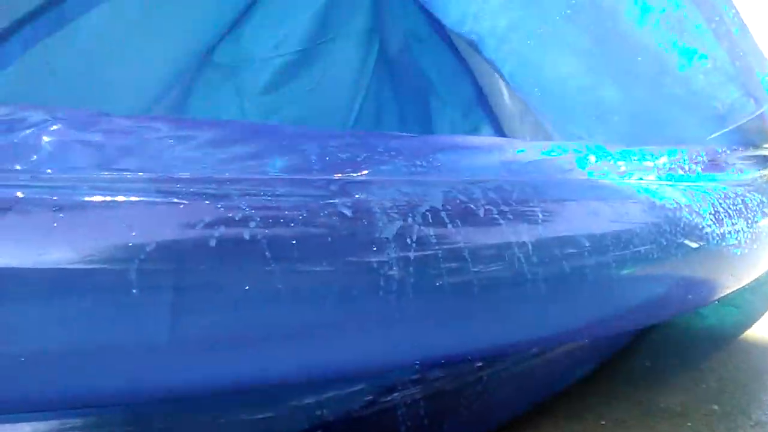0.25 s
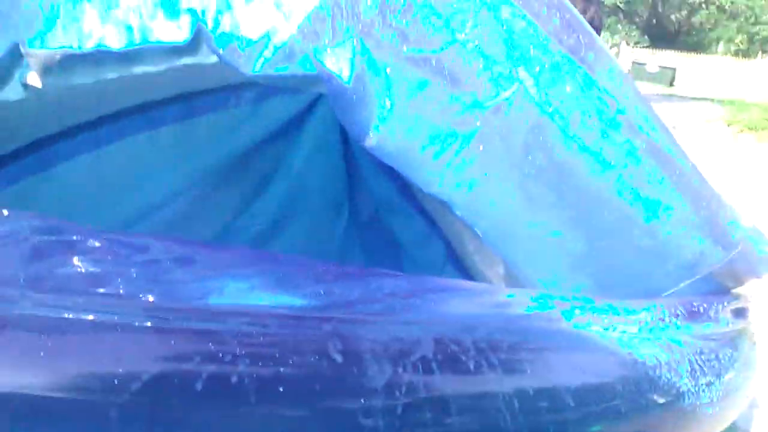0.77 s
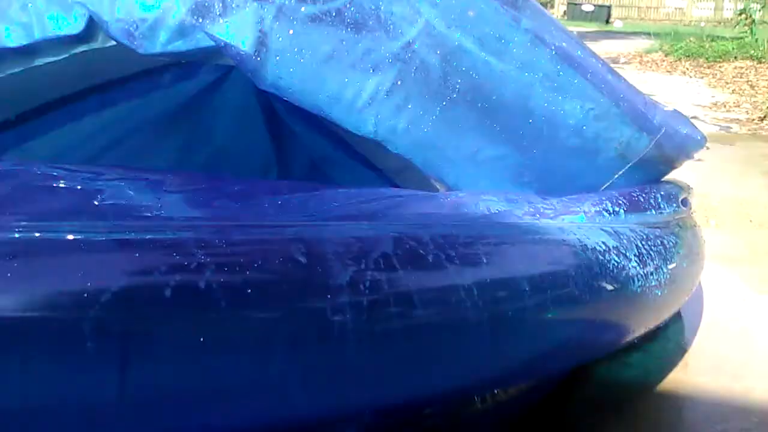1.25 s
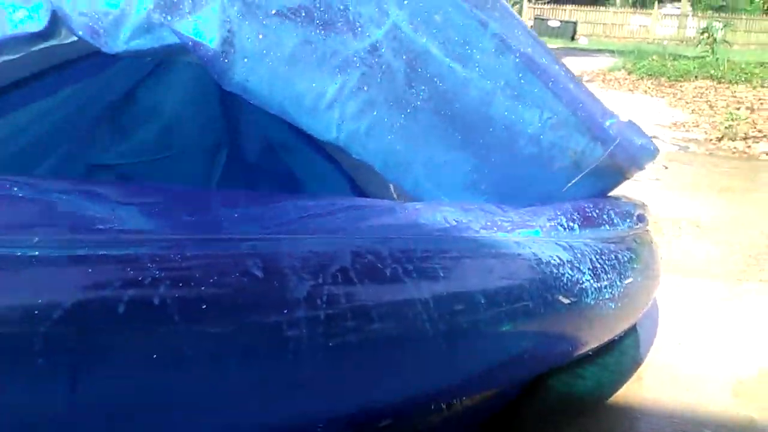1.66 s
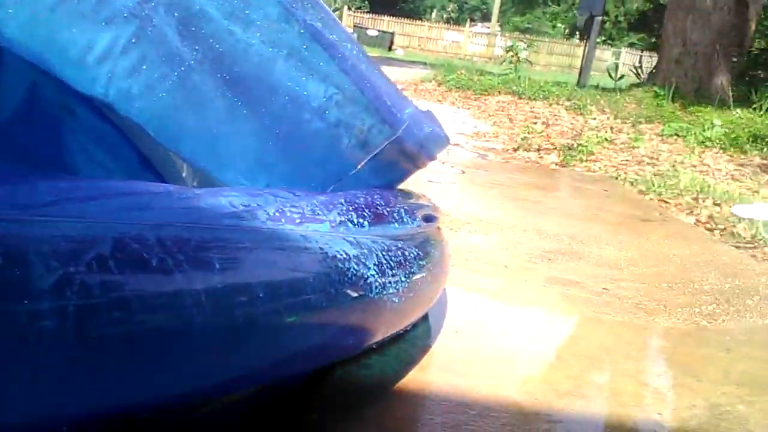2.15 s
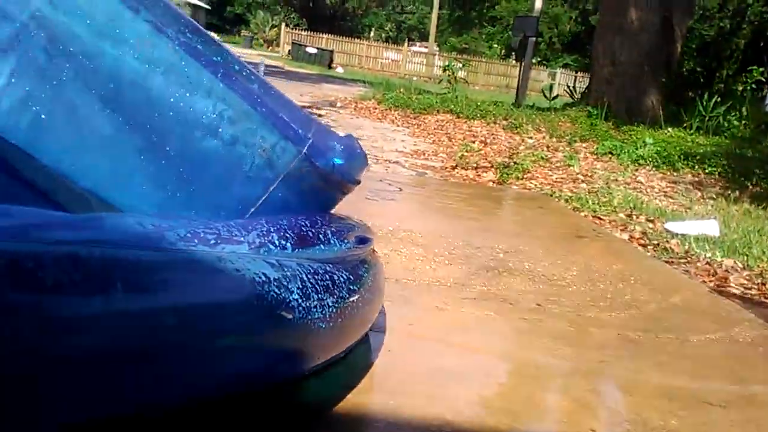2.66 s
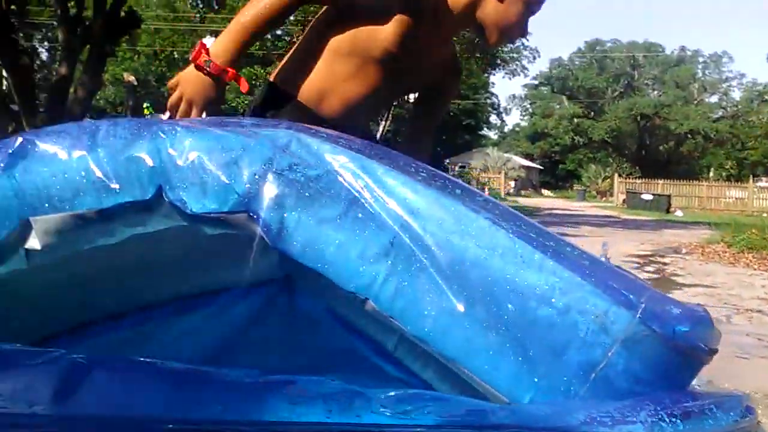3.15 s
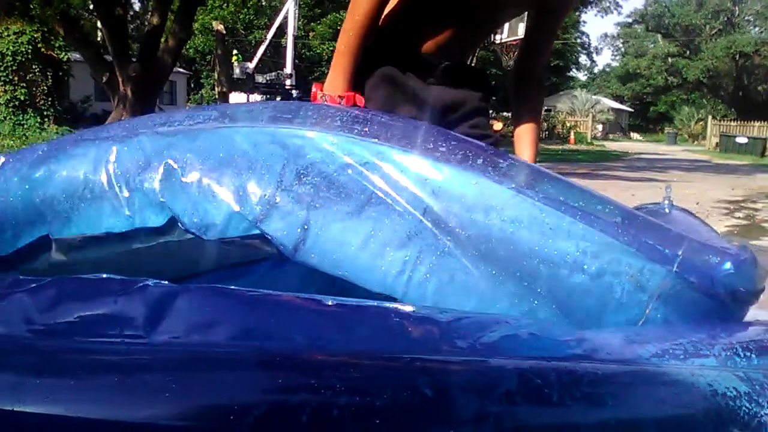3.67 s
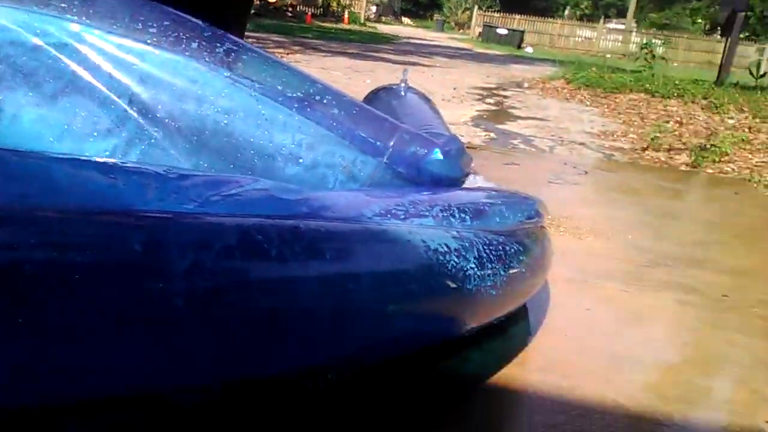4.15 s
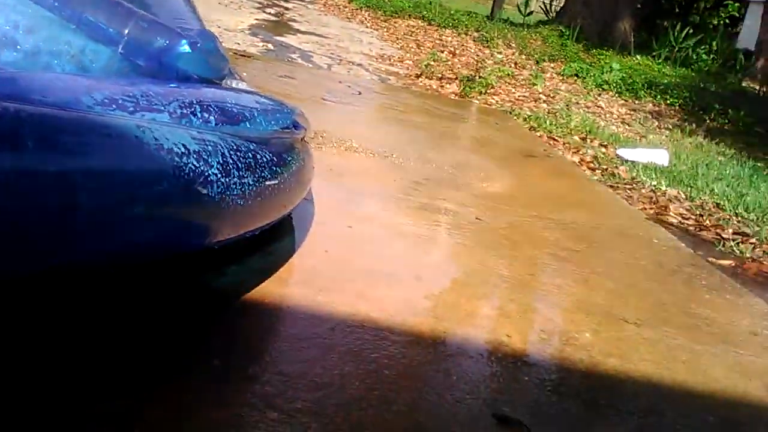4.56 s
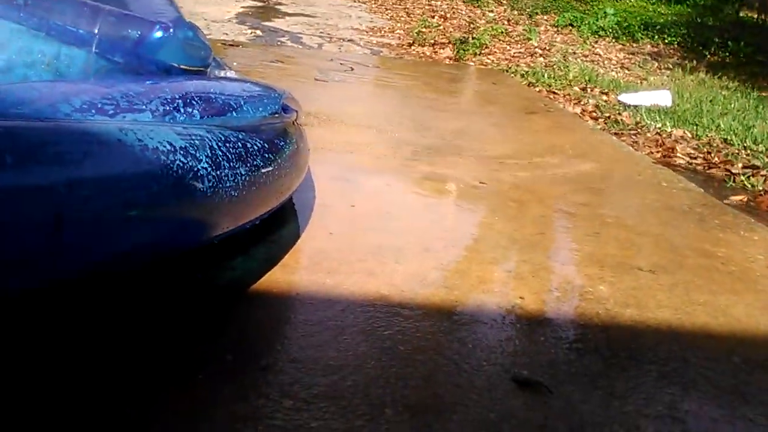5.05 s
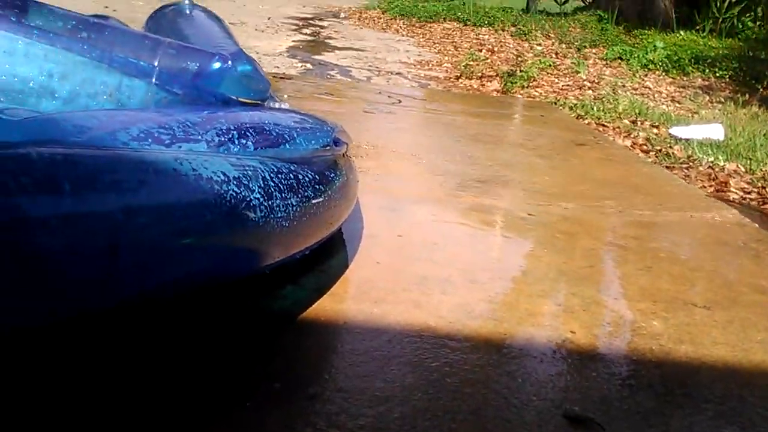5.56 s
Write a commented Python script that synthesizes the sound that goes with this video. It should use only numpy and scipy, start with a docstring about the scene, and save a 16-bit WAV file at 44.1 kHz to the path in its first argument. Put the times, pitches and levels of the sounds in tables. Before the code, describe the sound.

Water spills from a tipped inflatable pool onto a wet driveway, close by. It starts with a light hiss and separate bubbly plops, then gurgles in a quick cluster from about 1.2 to 1.7 seconds. After a brief lull, the strongest slosh arrives at 2.3 seconds with a dull bump and deep glugs, and busy bubbling and splatter continue until 3.3 seconds. The flow then thins to fine spray and small high drips, and is faint by 5 seconds. A thin, fluttering whistle sounds softly from 3.3 seconds and fades by about 5. Soft bumps come around 4.3 and 4.6 seconds, and a fold of vinyl snaps once at 4.7. Songbirds repeat short, slightly echoing chirps throughout, quieter than the water. Underneath are a faint idling engine, distant road rumble and a light outdoor hiss.

```python
"""Water spills and gurgles out of a tipped vinyl pool onto a driveway, close by.
Spray hisses, trapped air rings as bubbles, drops burst on the wet ground and, late on, a fold of
vinyl pops open. Songbirds whistle from the trees, which scatter their notes back, and a thin
whistling tone swells and fades. Underneath are a few dull bumps, an engine idling far off,
the murmur of distant roads and a faint hiss of air."""
import sys
import numpy as np
from scipy import signal
from scipy.fft import rfft, irfft, next_fast_len
from scipy.io import wavfile
from scipy.ndimage import uniform_filter1d

SR = 44100
rng = np.random.default_rng(int(sys.argv[2]) if len(sys.argv) > 2 else 0)


def digitize_waveform(pressure):
    """Quantize a signal to 16-bit integers and store it at the path in sys.argv[1].

    Rows of a 2-D input are taken as channels; values are limited to [-1, 1].
    """
    field = np.atleast_2d(pressure).T
    bounded = np.clip(field, -1, 1)
    quanta = np.round(bounded * 32767).astype(np.int16)
    wavfile.write(sys.argv[1], SR, quanta)


N = 256220


def gain_of(db):
    """Decibels to amplitude."""
    return 10 ** (np.asarray(db) / 20)


def unit_rms(x):
    """Scales a signal to rms 1."""
    return x / np.sqrt(np.mean(x ** 2) + 1e-20)


def fader(table, column):
    """Gain at every sample, riding one dB column of a table whose rows start with a time."""
    rows = np.array(table)
    return gain_of(np.interp(np.arange(N) / SR, rows[:, 0], rows[:, column]))


def add(mix, start_s, sound):
    """Drops a sound into the mix at its start time."""
    part = mix[round(start_s * SR):][:len(sound)]
    part += sound[:len(part)]


def coloured(x, eq):
    """Equalises through (Hz, dB) points joined on a log-frequency axis."""
    size = next_fast_len(len(x), True)
    hz, db = np.transpose(eq)
    curve_db = np.interp(np.log(np.fft.rfftfreq(size, 1 / SR) + 1), np.log(hz + 1), db)
    return irfft(rfft(x, size) * gain_of(curve_db), size)[:len(x)]


def wander(hz, count=N):
    """Smooth random modulation up to about the given rate, rms 1."""
    lowpass = signal.butter(2, min(hz, 600), fs=SR / 32)
    steps = signal.lfilter(*lowpass, rng.standard_normal(count // 32 + 1000))[900:]
    return np.interp(np.arange(count) / 32, np.arange(len(steps)), unit_rms(steps))


def patchy_noise(patch_db, flicker_db):
    """White noise with loud and soft patches across time and pitch, and an overall flicker."""
    frames = N // 128 + 8
    real, imag, patches = rng.standard_normal((3, 129, frames))
    patches = uniform_filter1d(patches, size=5, axis=0)
    patches = unit_rms(uniform_filter1d(patches, size=15, axis=1))
    flicker = unit_rms(uniform_filter1d(rng.standard_normal(frames), size=4))
    spectra = (real + 1j * imag) * gain_of(patch_db * patches + flicker_db * flicker)
    return signal.istft(spectra, nperseg=256, noverlap=128, window="cosine")[1][:N]


def echoes(x, t60):
    """Nearby surfaces scatter sound back as sparse taps; moving air blends two such patterns."""
    t, taps = np.arange(SR // 2) / SR, np.zeros((2, SR // 2))
    slots = np.arange(100, SR // 2 - 20, 20)
    arrivals = slots + rng.integers(0, 20, (2, len(slots)))
    np.put_along_axis(taps, arrivals, rng.choice([-1., 1.], arrivals.shape), axis=1)
    taps *= gain_of(-60 * t / t60) * (1 - np.exp(-t / 0.0033))
    first, second = (signal.fftconvolve(x, row / np.linalg.norm(row))[:N] for row in taps)
    blend = 1.41 * wander(20.0)
    return first * np.cos(blend) + second * np.sin(blend)


def bubble(hz, t60, glide):
    """A bubble rings briefly and rises in pitch as it nears the surface."""
    t = np.arange(round(t60 * SR) + 2) / SR
    phase = 2 * np.pi * hz * (t + glide * t ** 2 / t60)
    attack = 1 - np.exp(-t * hz / 7.5)
    return np.sin(phase) * gain_of(-60 * t / t60) * attack


def swarm(lo_hz, hi_hz, per_s, cycles, spread_db, pitches):
    """A crowd of random bubbles, a few of them loud, each dying away over a set number of cycles."""
    out, chance = np.zeros(N), rng.random(N) * SR / per_s
    strength = gain_of(spread_db * np.minimum(rng.exponential(1, N), 4))
    rings = [bubble(hz, cycles / hz, glide=.05) * np.sqrt(hz)
             for hz in np.geomspace(lo_hz, hi_hz, pitches)]
    for at in np.flatnonzero(chance < 1):
        add(out, at / SR, strength[at] * rings[int(chance[at] * pitches)])
    return unit_rms(out)


def water():
    """The spill: hissing spray, a fizzing trickle, a gurgle of bubbles and each slosh's deep glugs."""
    # Each row: time in seconds, then the levels of spray, gurgle and glugs in dB.
    flow = [(0.0, -46.5, -55.5, -73), (0.11, -60, -60, -67), (0.3, -60, -75, -74.5),
            (0.63, -60, -59.5, -77), (0.9, -65.5, -75, -80), (1.18, -64.5, -65.5, -71.5),
            (1.27, -64.5, -55, -95), (1.45, -64, -51.5, -63.5), (1.55, -67, -57.5, -67),
            (1.61, -63.5, -55.5, -69), (1.75, -73.5, -69.5, -78.5), (2.04, -67.5, -61, -75.5),
            (2.26, -52, -49, -48.5), (2.36, -52, -53.5, -57), (2.5, -54.5, -55.5, -69.5),
            (2.63, -55, -56.5, -72), (2.73, -51, -49, -65), (2.85, -59.5, -55, -74), (2.98, -53, -53, -67),
            (3.11, -55, -55.5, -65), (3.2, -53, -54, -57.5), (3.45, -53, -61.5, -85), (3.8, -55, -65, -94),
            (4.15, -61.5, -66, -84), (4.68, -65.5, -70.5, -78), (5.28, -79, -70, -83),
            (5.44, -75, -80, -79.5), (5.81, -67, -73, -80)]
    # The finest spray. Each row: time in seconds, gain above 10.5 kHz in dB.
    sparkle = [(0, 10.5), (1.9, 13.5), (2.9, 7.5), (3.5, -12.5), (5.81, 6.5)]
    # The colour of each layer. Each row: frequency in Hz, gain in dB.
    spray_eq = [(3290, -40.5), (5600, -2), (6290, -5), (8270, -1), (11500, -16), (14500, -18.5)]
    trickle_eq = [(2600, -24), (3800, -15), (4900, -15), (6000, -24), (8000, -33)]
    gurgle_eq = [(800, -40), (1080, -12), (1250, 0), (1900, 1), (2550, 0), (2800, -11), (3600, -15),
                 (4300, -24), (6000, -50)]
    glug_eq = [(200, -29), (400, -9), (520, -36.5), (750, -7), (1050, -10), (1250, -8.5), (1800, -35)]
    spray_gain, gurgle_gain, glug_gain = (fader(flow, column) for column in (1, 2, 3))
    trickle_gain = gain_of(-5.5) * spray_gain * (gurgle_gain / spray_gain) ** 0.061  # tracks the spray
    churn = np.clip(gurgle_gain / gain_of(-44.5), 0, 1)  # only a strong flow traps air

    spray = unit_rms(patchy_noise(patch_db=3.3, flicker_db=1.9))
    spray += .22 * swarm(6520, 12100, per_s=600, cycles=24, spread_db=2.2, pitches=12)
    finest = signal.filtfilt(*signal.butter(2, 10500, "high", fs=SR), spray)
    spray += (fader(sparkle, 1) - 1) * finest
    trickle = unit_rms(patchy_noise(patch_db=2.5, flicker_db=2.7))
    trickle += .12 * swarm(4500, 6200, per_s=60, cycles=60, spread_db=2.4, pitches=8)
    gurgle = unit_rms(patchy_noise(patch_db=4.3, flicker_db=2.3))
    gurgle += .62 * churn * swarm(900, 2700, per_s=200, cycles=85, spread_db=2.3, pitches=16)
    glugs = unit_rms(patchy_noise(patch_db=2.7, flicker_db=1.8))
    glugs += .4 * churn * swarm(450, 1150, per_s=120, cycles=30, spread_db=2.5, pitches=12)
    layers = [(spray_gain, spray, spray_eq), (gurgle_gain, gurgle, gurgle_eq),
              (glug_gain, glugs, glug_eq), (trickle_gain, trickle, trickle_eq)]
    return sum(gain * unit_rms(coloured(layer, eq)) for gain, layer, eq in layers)


def engine_and_roads():
    """A far engine's firing orders waver over a low rumble; distant roads murmur steadily beneath."""
    # The colour of rumble and murmur. Each row: frequency in Hz, gain in dB.
    rumble_eq = [(15, -54), (25, -17), (45, -13.5), (62, 6), (81, 0.5), (167, -0.5), (225, 1), (290, -8.5),
                 (442, -31), (600, -26), (780, -37), (1320, -120)]
    # The firing orders. Each row: frequency in Hz, level in dB relative to the rumble.
    orders = [(80, -5), (107.3, 2.5), (160.8, -3.5), (187.5, -16.5), (214, -16.5)]
    # Each row: time in seconds, then the engine's level in dB below 140 Hz, up to 250 Hz and above.
    band_levels = [(0, -79, -51, -69.5), (.9, -68.5, -61, -69.5), (1.3, -58.5, -64.5, -65),
                   (2.1, -56.5, -58, -63), (2.3, -50.5, -56.5, -51.5), (2.55, -59, -63.5, -66),
                   (4.8, -59, -63.5, -69), (5.3, -80, -59.5, -66), (5.81, -62, -54, -68)]
    t = np.arange(N) / SR
    idle, roads = (unit_rms(coloured(noise, rumble_eq)) for noise in rng.standard_normal((2, N)))
    murmur = signal.filtfilt(*signal.butter(2, 85, fs=SR), roads)
    for hz, db in orders:
        gain = gain_of(db + 3.64 * wander(2.9))
        idle += gain * np.sin(2 * np.pi * (hz * t + 0.12 * wander(1.85)))
    low = signal.filtfilt(*signal.butter(3, 140, fs=SR), idle)
    high = signal.filtfilt(*signal.butter(3, 250, "high", fs=SR), idle)
    bands = low, idle - low - high, high
    engine = sum(fader(band_levels, column) * unit_rms(band) for column, band in enumerate(bands, 1))
    return engine + gain_of(-68.5) * unit_rms(murmur)


def air():
    """A faint, even bed of outdoor hiss."""
    # Each row: frequency in Hz, gain in dB.
    air_eq = [(180, -35), (300, -6), (1030, -31), (1850, -29), (2070, -28), (2640, 2), (14500, -47)]
    return gain_of(-81) * unit_rms(coloured(patchy_noise(patch_db=0.98, flicker_db=0.18), air_eq))


def bumps():
    """Dull, close bumps, each a few heavily damped low cycles."""
    # Each row: start in seconds, peak level in dB, pitch in Hz.
    hits = [(0.04, -46.5, 68.4), (0.559, -53, 65), (1.132, -48.5, 75.5), (1.43, -47, 91),
            (2.018, -42.5, 74), (2.2863, -33.5, 172), (2.2905, -35.5, 330), (2.411, -41, 164),
            (2.469, -50, 58.6), (3.029, -57, 61.6), (3.878, -52, 65.5), (4.29, -43.5, 197),
            (4.48, -49, 108), (4.634, -40.5, 180)]
    out, t = np.zeros(N), np.arange(SR // 8) / SR
    for start, db, hz in hits:
        age = t * hz / 0.85  # the envelope peaks after 0.85 cycles
        add(out, start, gain_of(db) * np.sin(2 * np.pi * hz * t) * age * np.exp(1 - age))
    return out


def plops():
    """Single loud bubbles close in the stream; the hollow under the vinyl answers each briefly."""
    # Each row: start in seconds, level in dB, pitch in Hz.
    closings = [(0.0518, -32, 1940), (0.074, -39, 684), (0.1282, -24, 2040), (0.2803, -37, 4030),
                (0.281, -37, 707), (0.414, -20.5, 2034), (0.549, -27, 2010), (0.739, -41.5, 805),
                (0.9997, -44.5, 1920), (1.098, -44, 773), (1.2206, -26.5, 1893), (1.29, -41, 935),
                (1.306, -41, 946), (1.3308, -25, 1794), (1.3701, -28, 1644), (1.398, -28.5, 956),
                (1.501, -27, 1660), (1.592, -30, 1344), (1.932, -40, 1950), (2.0572, -32.5, 1960),
                (2.212, -29, 418), (2.777, -33, 2400), (2.82, -32, 2500), (2.85, -33, 2490),
                (2.885, -34, 2590), (1.47, -39, 2200), (1.6, -36, 1800), (2.264, -44, 2360),
                (2.288, -21.5, 398), (2.5167, -30, 2220), (2.701, -35, 315), (2.715, -29, 1600),
                (2.716, -34, 1970), (2.675, -36, 1280), (2.7685, -27, 1820), (2.794, -30, 1520),
                (2.869, -33.5, 920), (2.89, -38, 690), (2.908, -36, 787), (2.912, -40, 1300),
                (2.9596, -29.5, 1760), (3.043, -29.5, 2180), (3.05, -33, 1950), (3.128, -24.5, 984),
                (3.146, -26, 1202), (3.165, -40, 397), (3.22, -24, 1990), (4.389, -29, 3460),
                (4.4919, -34.5, 3200), (4.5792, -34.5, 3410), (4.8883, -45, 3680), (0.229, -33.5, 2160),
                (2.235, -38.5, 425), (2.25, -33, 646), (2.408, -33.5, 930), (4.587, -44, 3700),
                (0.236, -38, 6460), (0.451, -35, 5480), (0.545, -43, 4550), (0.6999, -38, 5200),
                (1.09, -39, 6100), (1.1694, -42, 5250), (1.229, -27, 1950), (1.3, -31, 2350),
                (1.332, -41, 4750), (1.335, -28.5, 1294), (1.342, -42, 5450), (1.352, -27, 2350),
                (1.362, -30, 1350), (1.386, -28, 1870), (1.4023, -35, 4650), (1.411, -35.5, 890),
                (1.485, -33, 2340), (1.505, -31, 2310), (1.6, -39, 794), (1.613, -30.5, 2480),
                (1.6296, -33.5, 5250), (1.685, -36.5, 2370), (2.1372, -50, 5770), (2.499, -33, 2660),
                (2.533, -32, 2420), (2.562, -34.5, 1310), (2.5921, -32.5, 4960), (2.672, -30.5, 1760),
                (2.679, -36, 4370), (2.73, -29, 1320), (2.789, -33, 2470), (2.848, -40, 975),
                (2.886, -31.5, 2030), (2.9373, -33, 5000), (2.9608, -35, 5070), (2.996, -34, 2790),
                (3.017, -31, 1950), (3.068, -29, 1360), (3.082, -44, 1400), (3.155, -31, 776),
                (3.177, -27, 1810), (3.27, -29, 1980), (3.54, -34, 4900), (3.543, -42, 3850),
                (3.6532, -34, 4900), (3.7026, -47, 5600), (3.9016, -33, 5100), (3.957, -35.5, 5060),
                (4.1192, -35.5, 5180)]
    # The colour of the hollow. Each row: frequency in Hz, gain in dB.
    hollow_eq = [(300, 7), (900, 2.5), (2500, 3), (5000, 3)]
    out = np.zeros(N)
    for start, db, hz in closings:
        t60 = 0.029 * (1000 / hz) ** 0.64  # smaller, higher bubbles die sooner
        add(out, start, gain_of(db) * bubble(hz, t60, glide=0.027))
    return out + gain_of(-8) * coloured(echoes(out, t60=.22), hollow_eq)


def tone(curve, waver):
    """A wavering sine along (seconds, Hz, dB) points; returns its start time and its sound."""
    times, hz, db = np.transpose(curve)
    t = np.arange(times[0], times[-1], 1 / SR)
    pitch = np.interp(t, times, hz) * (1 + waver * wander(58.5, count=len(t)))
    fade = np.minimum(1, np.minimum(t - times[0], times[-1] - t) / .005)
    envelope = np.sqrt(2) * gain_of(np.interp(t, times, db)) * fade
    return times[0], envelope * np.sin(2 * np.pi * np.cumsum(pitch) / SR)


def song(motif, phrases, waver):
    """One bird repeats its motif, each note a bent glide under a gentle swell."""
    out, progress = np.zeros(N), np.linspace(0, 1, num=12)
    for start, ratio, *levels in phrases:
        for (delay, length, start_hz, end_hz, bend, crest), db in zip(motif, levels):
            times = start + delay + length * progress
            hz = ratio * (end_hz + (start_hz - end_hz) * (1 - progress) ** bend)
            swell_db = -1.5 * ((progress - crest) / max(crest, 1 - crest)) ** 2
            add(out, *tone(np.transpose([times, hz, db + swell_db]), waver))
    return out


def birds():
    """Birdsong flutters in the moving air and smears in the trees; far birds arrive mostly as echo."""
    # Motifs. Each row is a note: delay and length in seconds, start and end pitch in Hz,
    # bend (over 1 glides early, under 1 late), loudest point as a share of the note.
    tumble = [(-.05, 0.035, 2800, 3080, 1.1, .6), (0, .015, 4250, 3760, 1.5, .8),
              (.014, 0.05, 3760, 3030, .85, 0.7)]
    cluck = [(0, .034, 2780, 2360, 1.05, 0.55)]
    snatch = [(-.04, .03, 3020, 3130, 1.2, 0.64), (0, 0.033, 4200, 3330, 1.9, 0.6)]
    lilt = [(-.008, 0.036, 2560, 2940, 1.2, 0.75), (.03, .03, 2700, 2590, 1.5, .5),
            (.046, 0.06, 2320, 2220, 3, 0.5), (.132, 0.04, 3280, 3480, 1.3, .55)]
    peep = [(0.0013, 0.04, 2320, 2145, 1.3, 0.26)]
    rasp = [(-.06, 0.0318, 2535, 3130, 1.12, 0.92), (0, 0.0444, 4123, 3420, 0.437, 0.23)]
    # Cues for each motif. Each row: time in seconds, pitch ratio, then each note's pre-mix level in dB.
    tumble_cues = [(0.177, 0.96, -75, -60, -53.5), (0.425, 0.98, -62, -55.5, -49.5),
                   (0.679, 1.047, -54, -55, -51), (0.966, 1.0, -54.5, -51.5, -48.5),
                   (1.221, 0.99, -59.5, -53, -50)]
    cluck_cues = [(0.236, 0.96, -54.5), (0.489, 1.02, -56.5), (0.748, 1, -61.5), (1.026, 1.01, -61),
                  (1.285, 1.07, -61)]
    snatch_cues = [(1.946, 0.99, -53, -51), (2.232, 0.93, -70, -53), (2.549, .99, -70, -58)]
    lilt_cues = [(2.84, 1.05, -58, -64, -80, -78), (3.175, 1, -55, -69, -70, -59),
                 (3.51, 1, -56, -60, -57, -56), (3.852, 1.015, -55.5, -54.5, -68, -54),
                 (4.185, 1.01, -55.5, -55, -54, -51), (4.525, 1.015, -63, -57, -58, -54),
                 (4.845, 1.004, -60.5, -61.5, -66, -55.5)]
    peep_cues = [(5.22, 1.13, -69.5), (5.54, 0.95, -68), (5.738, 0.73, -68), (5.788, 0.76, -54)]
    rasp_cues = [(5.366, 1.01, -55, -56), (5.679, .99, -57.5, -52.5)]
    # The colour of the trees' echo. Each row: frequency in Hz, gain in dB.
    trees_eq = [(2000, -5), (2650, 0), (3200, -5), (3700, 2), (4400, -3)]
    near = song(tumble, tumble_cues, waver=.008) + song(cluck, cluck_cues, waver=.008)
    far_birds = (lilt, lilt_cues), (snatch, snatch_cues), (peep, peep_cues)
    far = sum(song(motif, cues, waver=.01) for motif, cues in far_birds)
    hoarse = song(rasp, rasp_cues, waver=.035)
    direct = (1.1 * near + .7 * far + .4 * hoarse) * gain_of(3 * wander(70))
    scattered = coloured(echoes(near + 1.15 * far + hoarse, t60=.52), trees_eq)
    return direct + np.roll(scattered, round(.008 * SR))  # the nearest trees answer 8 ms late


def splats():
    """Drops burst on the wet ground, each a short puff of noise around its own pitch."""
    # Each row: start in seconds, level in dB, centre in Hz, seconds to fall by 60 dB.
    drops = [(1.2204, -41, 2070, 0.087), (1.3315, -31.5, 1870, 0.015), (1.502, -45, 1800, 0.041),
             (2.223, -43, 1940, 0.084), (2.264, -34, 2600, 0.035), (2.3267, -40, 2310, 0.16),
             (2.665, -50.5, 2400, 0.19), (2.719, -49, 1580, 0.04), (0.261, -51, 8400, 0.31),
             (0.448, -47, 6400, 0.032), (1.0901, -36.5, 9400, 0.011), (1.181, -52, 4300, 0.047),
             (1.3313, -52, 4900, 0.07), (1.575, -50, 7260, 0.14), (2.406, -39, 8300, 0.15),
             (2.763, -44.5, 8360, 0.023), (2.419, -49.5, 4500, 0.14), (1.588, -44.5, 2470, 0.036),
             (3.01, -39.5, 8170, 0.1), (3.5395, -42, 4320, 0.096), (3.792, -41.5, 8350, 0.014),
             (4.7854, -54, 4270, 0.031), (0.4494, -50, 12800, 0.03), (1.5998, -61, 12700, 0.08),
             (2.4055, -53, 12400, 0.02), (2.4058, -34, 7960, 0.016), (2.7136, -38, 9700, 0.019),
             (2.8843, -53, 9600, 0.049), (2.9377, -45, 9400, 0.04), (3.0108, -49, 12600, 0.02),
             (3.01, -34, 8300, 0.012), (2.2298, -50, 10500, 0.03), (5.392, -66, 7940, 0.055),
             (5.701, -57.5, 7650, 0.03)]
    out, t = np.zeros(N), np.arange(2000) / SR
    attack = 1 - np.exp(-t / .0006)
    for start, db, hz, t60 in drops:
        bandpass = signal.butter(2, [hz / 1.19, min(hz * 1.12, 16000)], "band", fs=SR)
        puff = unit_rms(signal.lfilter(*bandpass, rng.standard_normal(len(t))))
        add(out, start, gain_of(db - 60 * t / t60) * puff * attack)
    return out


def whistle():
    """A thin fluttering tone, joined for a while by a weaker one just below; the trees roughen both."""
    # Each row: time in seconds, pitch in Hz, level in dB before the flutter.
    upper = [(3.28, 1850, -60), (3.35, 1876, -54.5), (3.41, 1915, -56), (3.45, 1955, -50),
             (3.56, 1950, -51), (3.66, 1936, -56), (3.71, 1930, -61), (3.78, 1925, -51.5),
             (3.84, 1935, -58.5), (3.88, 1957, -68), (4.02, 1928, -59), (4.07, 1908, -48.5),
             (4.18, 1915, -51.5), (4.21, 1920, -54), (4.25, 1925, -54), (4.5, 1918, -54.5),
             (4.56, 1900, -58.5), (4.8, 1882, -65.5), (5.1, 1838, -66.5), (5.4, 1765, -85)]
    lower = [(3.55, 1846, -66), (3.95, 1842, -72), (4.1, 1800, -64.5), (4.4, 1788, -64), (4.6, 1806, -66),
             (4.7, 1860, -78)]
    out = np.zeros(N)
    add(out, *tone(upper, waver=.004))
    add(out, *tone(lower, waver=.0051))
    flutter = gain_of(3 * wander(25) - 1.5)
    return out * flutter + gain_of(-6) * echoes(out, t60=.4)


def vinyl_snap():
    """A fold of taut vinyl pops open: each mode swells and dies within a few milliseconds."""
    # Each row: frequency in Hz, relative level in dB, swell length in seconds.
    modes = [(2130, 1.5, 0.0008), (5100, -15, 0.0026), (7580, -6.5, 0.00069), (8870, 1, 0.00038)]
    # Each row: start in seconds, gain in dB.
    cues = [(4.6654, -15.5)]
    out, t, pop = np.zeros(N), np.arange(600) / SR, np.zeros(600)
    for hz, db, length in modes:
        age = t / length
        swell = 3 * age * np.exp(1 - 3 * age - (age / 2) ** 2)
        pop += gain_of(db) * swell * np.sin(2 * np.pi * hz * t)
    pop = signal.lfilter(*signal.butter(6, 1350, "high", fs=SR), pop)
    for start, db in cues:
        add(out, start, gain_of(db) * pop)
    return out


def scene():
    """Everything sits in the centre; only the treble of water, drops and air spreads left and right."""
    drops, snap = splats(), vinyl_snap()
    near = plops() + snap + gain_of(-19) * echoes(drops + snap, t60=0.54)
    wide = water() + drops + air()
    mid = wide + near + birds() + whistle() + engine_and_roads() + bumps()
    # Stereo width. Each row: frequency in Hz, gain of the side signal in dB.
    side_eq = [(2500, -86), (4300, -50), (5700, -12.5), (8000, -1), (14500, -3.5)]
    side = coloured(wide * np.sin(3 * wander(250)), side_eq)  # a restless gain makes it unlike the mid
    return np.array([mid + side, mid - side])


def record(dry):
    """A steep low-pass trims the very top of the treble."""
    lowpass = signal.firwin(511, cutoff=14300, window=("kaiser", 9), fs=SR)
    return signal.oaconvolve(dry, lowpass[None], "same")


dry = scene()
out = record(dry)
digitize_waveform(out)
```